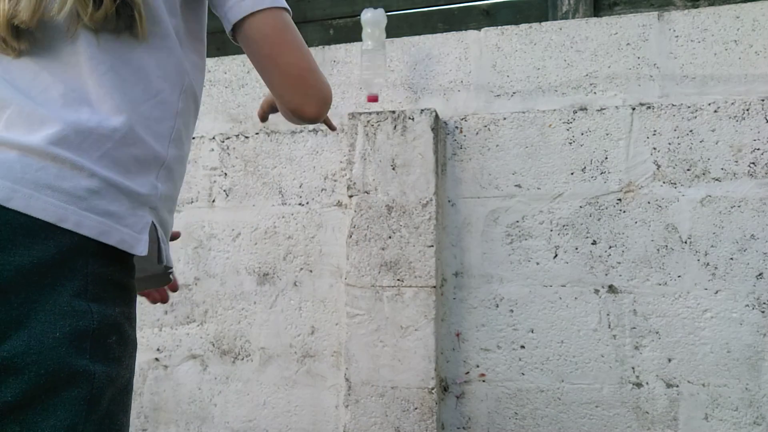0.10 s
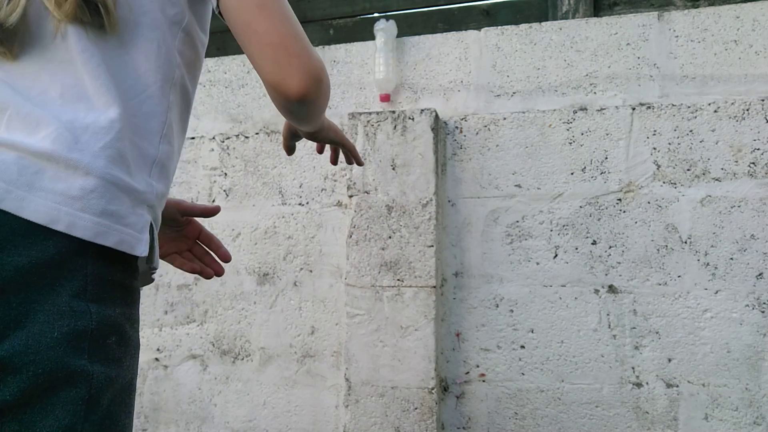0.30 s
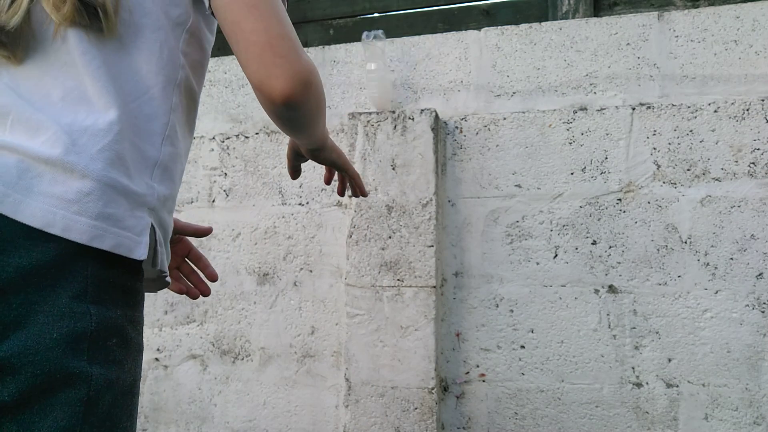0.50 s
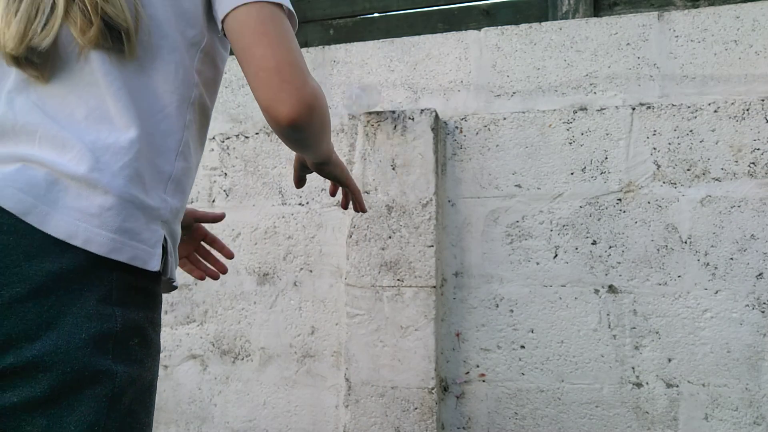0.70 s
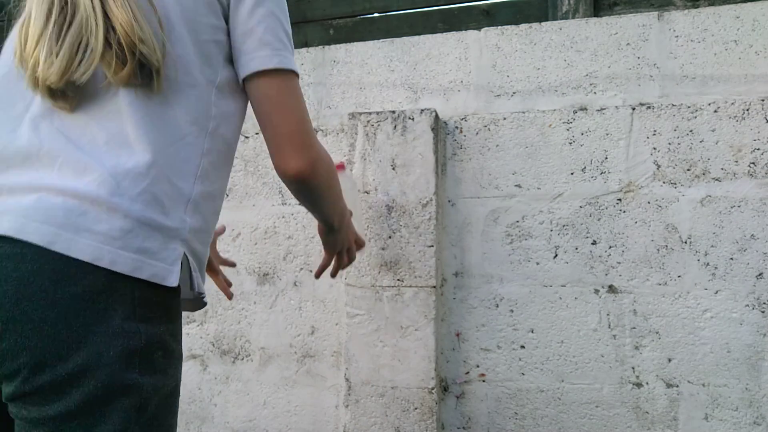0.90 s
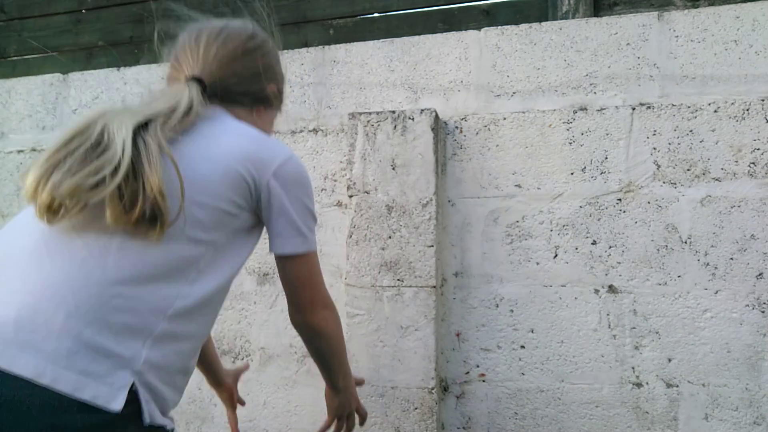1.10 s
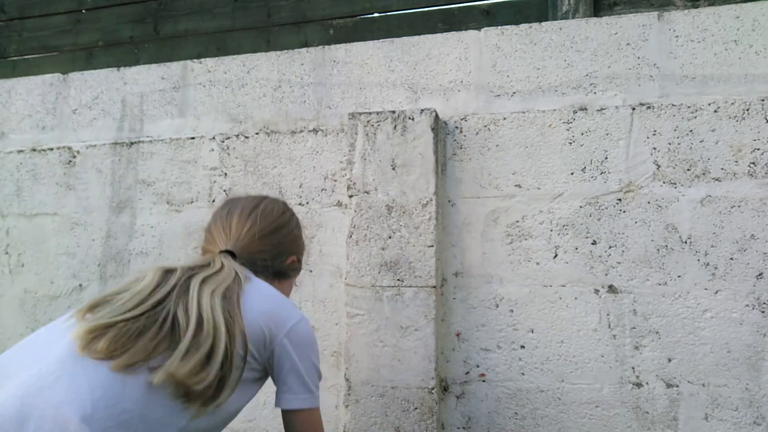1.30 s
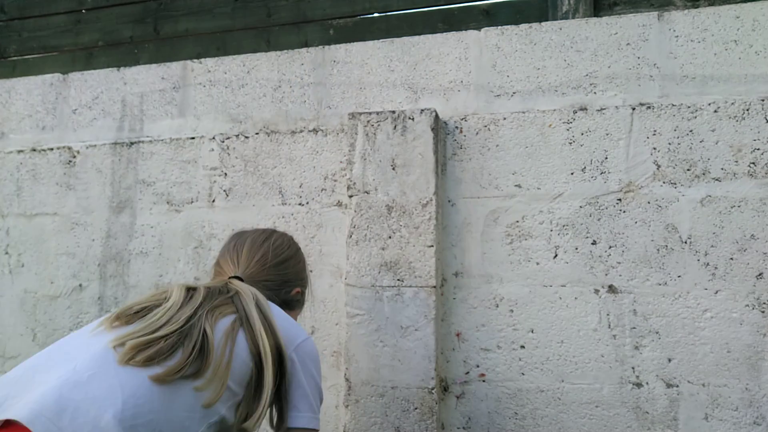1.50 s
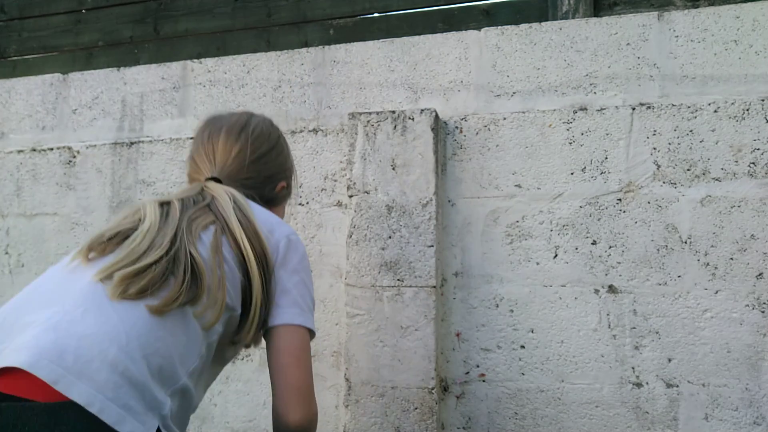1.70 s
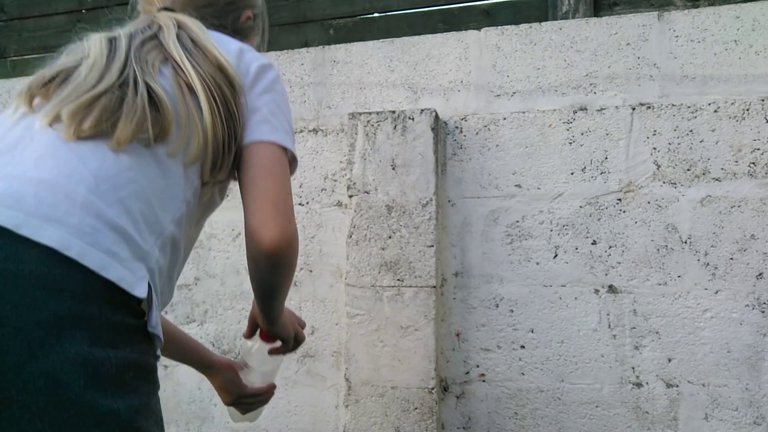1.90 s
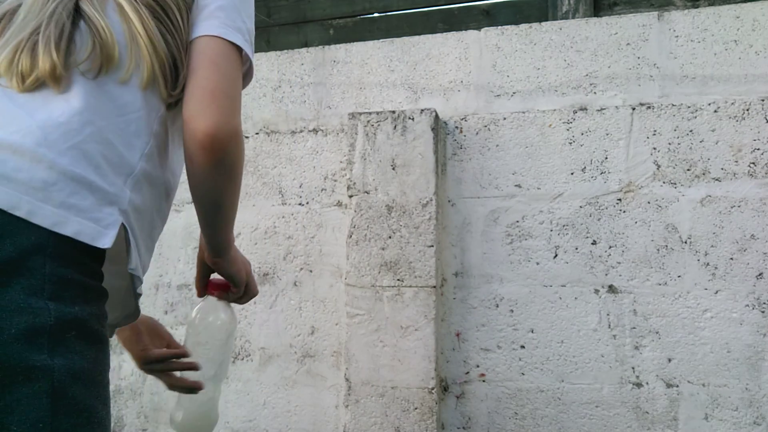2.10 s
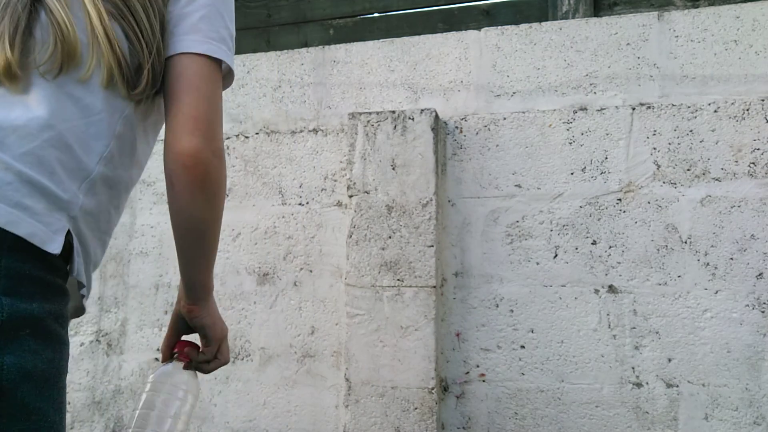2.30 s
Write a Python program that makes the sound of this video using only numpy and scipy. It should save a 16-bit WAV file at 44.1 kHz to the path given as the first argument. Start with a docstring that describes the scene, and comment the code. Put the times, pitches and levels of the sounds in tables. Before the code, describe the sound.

A partly filled plastic bottle knocks sharply on a concrete ledge at 0.2 seconds, bouncing and toppling by 0.4. After a few faint ticks, it hits gritty ground at about 1.2 seconds with a clatter, thud and crunch, bumping again at 1.4. Faint water dribbles, small clicks and rustling clothes follow until about 2.3 as it is picked up. The yard adds a short echo, and far traffic rumbles quietly.

```python
"""Far traffic rumbles under a faint hiss as a partly filled plastic bottle knocks on a concrete ledge.
It topples, drops to gritty ground and is picked up. Each knock rings the bottle's modes with a rattle
and a crack; its weight thuds, water dribbles inside and grit crunches. The yard walls send back a dull
wash and a few slaps. Clothes and soles rustle, and a low hum passes after the fall."""
import sys
import numpy as np
from scipy import signal
from scipy.fft import rfft, irfft
from scipy.io import wavfile
from scipy.ndimage import map_coordinates

SR = 44100
rng = np.random.default_rng(int(sys.argv[2]) if len(sys.argv) > 2 else 0)


def transcribe(u):
    """Save the signal u as a 16-bit wav file named by the first command-line argument.

    u: samples, shape (n,) or (channels, n), limited to [-1, 1]; the rate is SR.
    q: integer samples, one column per channel.
    """
    v = np.clip(np.atleast_2d(u).T, -1, 1)
    q = np.round(v * 32767).astype(np.int16)
    wavfile.write(sys.argv[1], SR, q)


N = 110250
TIME = np.arange(N) / SR
HIT_TIME = TIME[:SR // 4]


def amp(db):
    return 10 ** (np.asarray(db) / 20)


def unit_rms(x):
    return x / np.sqrt(np.mean(x ** 2) + 1e-20)


def filtered(x, order, hz, kind):
    return signal.sosfilt(signal.butter(order, hz, kind, fs=SR, output="sos"), x)


def at_hz(curve, hz):
    pitches, values = np.transpose(curve)
    return np.interp(np.log(hz), np.log(pitches), values)


def fader(rows, column=1):
    """Gain over time from a dB column; -90 dB before the first row, holding the last level afterwards."""
    rows = np.array(rows)
    return amp(np.interp(TIME, rows[:, 0], rows[:, column], left=-90))


def pan(db):
    """Stereo gains with the left louder by db."""
    return amp([[db / 2], [-db / 2]])


def place(track, start_s, sound, pan_db):
    i = int(start_s * SR)
    track[:, i:i + len(sound)] += pan(pan_db) * sound[:N - i]


def ring(hz, db, t60):
    """One mode: a sine that dies away."""
    return amp(db - 60 * HIT_TIME / t60) * np.sin(2 * np.pi * hz * HIT_TIME)


def drift(rate_hz):
    """Smooth random wander, rms about 1."""
    step = 40
    pole = np.exp(-2 * np.pi * rate_hz * step / SR)
    slow = signal.lfilter([1], [1, -2 * pole, pole ** 2], rng.standard_normal(N // step + 2002))[2000:]
    return np.interp(np.arange(N) / step, np.arange(len(slow)), unit_rms(slow))


# Stereo image of the noise layers, centred bass and wide treble: pitch_hz, correlation
NOISE_IMAGE = [(60, 0.99), (240, .85), (700, 0.17), (1500, 0), (15000, 0.17)]
def banded_noise(spectrum, flicker_db, rate_hz):
    """Stereo noise in half-octave bands that flicker mostly together; rms 1."""
    out, together = 0, drift(rate_hz)
    edges = 2 ** np.arange(np.log2(spectrum[1][0]) - .5, np.log2(spectrum[-1][0]) + .1, .5)
    white = rng.standard_normal((2, 2, N))
    for k, (low, high) in enumerate(zip(edges, edges[1:])):
        mid, side = filtered(white[k % 2], 2, [low, min(high, .45 * SR)], "band")
        hz = np.sqrt(low * high)
        alike = at_hz(NOISE_IMAGE, hz)
        gain = amp(at_hz(spectrum, hz) + flicker_db * (together + 0.2 * drift(rate_hz)))
        out = out + gain * (np.sqrt(1 + alike) * mid + np.sqrt(1 - alike) * side * [[1], [-1]])
    return unit_rms(out)


# Tone of the rumble: pitch_hz, density_db
TRAFFIC_EQ = [(15, -48.5), (25, -19.5), (59, -19), (83, -0.5), (102, 2), (194, -21.5), (260, -19),
              (340, -49), (570, -120)]
# Its swells: time_s, level_db
TRAFFIC_FADER = [(0, -66), (.3, -51), (.6, -66), (.85, -67.5), (1.0, -72.5), (1.5, -65), (1.9, -67.5),
                 (2.2, -68.5), (2.4, -69.5), (2.5, -67)]
def traffic():
    """Far traffic arrives as a slowly swelling bass noise."""
    return fader(TRAFFIC_FADER) * banded_noise(TRAFFIC_EQ, flicker_db=.7, rate_hz=15) * pan(-1.2)


# Tone of the outdoor bed: pitch_hz, density_db
AIR_EQ = [(150, -28.5), (200, -20.5), (300, -21), (400, -20.5), (550, -26), (1000, -22.5), (2500, -33.5),
          (5000, -32), (9000, -30), (12000, -39), (16000, -46)]
def air(level_db=-72.5):
    """A faint, nearly steady hiss."""
    return amp(level_db) * banded_noise(AIR_EQ, flicker_db=.5, rate_hz=20)


# The bottle's modes: pitch_hz
MODE_PITCHES = [330, 408, 508, 620, 773, 957, 1075, 1183, 1300, 1599, 1862, 2123, 2915, 3320]
# How each mode answers a blow: base_hit_db, side_hit_db, t60_s
MODE_RINGS = [(-18, -32, 0.01), (-9.5, -26.5, 0.067), (-3, 6, 0.022), (-8, -5.5, 0.047), (-10, -14, 0.069),
              (-1, 7.5, 0.016), (-6, -9.5, 0.02), (-1.5, -13, 0.03), (-8, -1, 0.021), (7.5, -24.5, 0.02),
              (-3, 3, 0.014), (-9, -15, 0.049), (-11, -8, 0.039), (-25.5, -22, 0.023)]
# Bottle hits (side_share 0 = base, 1 = side): start_s, level_db, side_share, centre_hz, crack_db, pan_db
KNOCKS = [(0.2057, -7, 0.14, 1320, -6.5, 0.5), (0.2972, -28.5, 0.7, 1600, -16, -10),
          (0.3028, -22.5, 0.36, 1460, -6.5, 1.5), (.308, -26.5, 0.1, 370, -30, -4),
          (.325, -38.5, .3, 1500, 0, 0), (0.4143, -14, 0.99, 825, -11, 0.5),
          (0.697, -40, 0.55, 1390, -7, -2), (0.705, -46.5, 0, 1223, -5, 3.5),
          (1.1657, -19.5, 0.51, 550, -31, -4.5), (1.173, -21, 1, 605, -1.5, 0),
          (1.1777, -16, 0.42, 890, -15, 3.5), (1.186, -26, 0.13, 770, -12, -8.5),
          (1.226, -33, 0.34, 660, -20, -2), (1.246, -47.5, 0.4, 640, -8, -13),
          (1.409, -44.5, 0.8, 900, 2, 2), (1.416, -42.5, .3, 1520, -17, 5),
          (1.425, -40.5, 0.5, 680, -14, -5), (1.551, -51, 0.12, 1400, 4, -2.5),
          (1.565, -38.5, 0.35, 1310, -38, -1)]
CONTACT_S, FALLOFF_DB_PER_OCT2, SCATTER_DB = 0.00044, 3, 1.2
RATTLE_DB, RATTLE_T60_S = -18, .045
CRACK_BAND_HZ, CRACK_T60_S, CRACK_TAIL_DB, CRACK_TAIL_T60_S = [1900, 8000], .009, -12, 0.064
def bottle_knocks():
    """Each blow rings the modes near its centre pitch; the plastic wall rattles and cracks."""
    out, t = np.zeros((2, N)), HIT_TIME
    for start_s, level_db, side_share, centre_hz, crack_db, pan_db in KNOCKS:
        scatter = rng.normal(0, SCATTER_DB, len(MODE_RINGS))
        noise = rng.standard_normal((2, len(t)))
        body = 0
        for hz, (base_db, side_db, t60), scatter_db in zip(MODE_PITCHES, MODE_RINGS, scatter):
            mode_db = base_db + side_share * (side_db - base_db) + scatter_db
            falloff_db = FALLOFF_DB_PER_OCT2 * np.log2(hz / centre_hz) ** 2
            body -= ring(hz, mode_db - falloff_db, t60)
        body *= 1 - np.exp(-t / CONTACT_S)
        rattle = unit_rms(filtered(noise[0], 2, [centre_hz / 1.7, centre_hz * 1.7], "band"))
        rattle *= amp(RATTLE_DB - 60 * t / RATTLE_T60_S)
        crack = filtered(noise[1], 1, CRACK_BAND_HZ, "band")
        crack *= amp(-60 * t / CRACK_T60_S) + amp(CRACK_TAIL_DB - 60 * t / CRACK_TAIL_T60_S)
        knock = body / np.abs(body).max() + rattle + amp(crack_db) * crack
        place(out, start_s, amp(level_db) * knock, pan_db)
    return filtered(out, 4, hz=260, kind="high")


# Reverb bands of the yard: pitch_hz, level_db, t60_s, correlation
YARD_WASH = [(250, -29.5, .35, .9), (493, -27.5, 0.1, .75), (1000, -35, 0.37, 1), (2000, -27.5, 0.16, .5),
             (4000, -26.5, 0.22, .4), (8000, -26, .3, .4), (13200, -35.5, 0.14, .4)]
# Slapback off the walls: delay_s, level_db, smear_s
WALL_SLAPS = [(.022, -14, .003), (.043, -3, .003), (.053, 2, 0.0025), (0.061, 0, 0.0016),
              (0.099, -11.5, 0.029)]
PREDELAY_S, WASH_HOLD_S, YARD_RETURN_DB = .004, 0.023, -17.5
def yard_echo(send):
    """The walls return smeared slaps and a wash that dies away in overlapping octaves."""
    t = TIME[:SR // 2]
    mid, side = rfft(rng.standard_normal((2, len(t))))
    slaps = sum(amp(db) * np.exp(-((t - delay) / smear) ** 2) for delay, db, smear in WALL_SLAPS)
    octaves = np.log2(np.arange(len(mid)) * 2 + 1)   # bins are 2 Hz apart
    centres = np.log2([row[0] for row in YARD_WASH])
    response = 0
    for k, (hz, db, t60, alike) in enumerate(YARD_WASH):
        white = np.sqrt(1 + alike) * mid + np.sqrt(1 - alike) * side * [[1], [-1]]
        band = irfft(white * np.interp(octaves, centres, np.arange(len(centres)) == k), len(t))
        wash = amp(-60 * np.maximum(t - WASH_HOLD_S, 0) / t60) * (t > PREDELAY_S)
        response += amp(db) * band * (wash + slaps)
    return amp(YARD_RETURN_DB) * signal.fftconvolve(send, response, axes=1)[:, :N]


# Low-end weight: start_s, level_db, pitch_hz, t60_s
THUDS = [(0.298, -29, 121, 0.052), (.305, -31.5, 411.6, .09), (1.167, -27.5, 125, 0.063),
         (1.176, -12.5, 157, 0.025), (1.214, -33, 240, 0.12), (1.26, -35, 158, 0.033),
         (1.313, -51.5, 106.3, 0.27), (1.407, -36, 154.5, 0.071), (1.411, -33, 287, 0.043),
         (1.424, -25.5, 479, 0.017)]
def thuds(attack_s=.003):
    """The water-laden bottle and the feet land as dull, soft-edged tones."""
    out = np.zeros((2, N))
    attack = 1 - np.exp(-HIT_TIME / attack_s)
    for start_s, db, hz, t60 in THUDS:
        place(out, start_s, ring(hz, db, t60) * attack, pan_db=-1.3)
    return out


# Moves of clothes and soles: time_s, treble_db, mid_db
RUSTLE_FADERS = [(0, -99, -85), (.5, -72, -62), (.62, -76.5, -71), (.8, -100, -81.5), (.84, -73, -70.5),
                 (.93, -92, -89), (1.05, -69.5, -71.5), (1.13, -73, -73), (1.33, -76, -71.5),
                 (1.43, -66.5, -65.5), (1.465, -56.5, -57.5), (1.5, -64.5, -72), (1.59, -70, -80),
                 (1.645, -63, -68), (1.71, -75.5, -70), (1.76, -68, -67), (1.82, -62, -63.5),
                 (1.9, -62, -62.5), (1.96, -64, -67), (2.01, -64.5, -62.5), (2.04, -60, -55),
                 (2.075, -62.5, -59.5), (2.1, -71.5, -67.5), (2.15, -67, -69.5), (2.19, -77, -71),
                 (2.3, -71.5, -66), (2.34, -72.5, -66), (2.375, -75.5, -72.5), (2.5, -84, -79)]
# Sheen of the rustle: pitch_hz, density_db
RUSTLE_TREBLE_EQ = [(1760, -35.5), (3000, -13), (8820, -1), (12000, -20), (14400, -19), (16000, -22)]
# Body of the rustle: pitch_hz, density_db
RUSTLE_MID_EQ = [(180, -41.5), (300, -9), (988, -10.5), (1110, -13.5), (1720, -11), (4000, -12),
                 (5200, -48.5), (8800, -120)]
def rustle():
    """Clothes and soles rub: two layers of fluttering noise, each on its own fader."""
    treble = fader(RUSTLE_FADERS, 1) * banded_noise(RUSTLE_TREBLE_EQ, flicker_db=1, rate_hz=60)
    mids = fader(RUSTLE_FADERS, 2) * banded_noise(RUSTLE_MID_EQ, flicker_db=1.2, rate_hz=50)
    return treble * pan(-1) + mids * pan(-2)


# Small, bright clicks: start_s, level_db, pitch_hz
TICKS = [(.568, -59, 3300), (.586, -58.5, 1800), (.638, -60, 1900), (.78, -50.5, 2970), (.815, -44, 7570),
         (.82, -57, 1350), (.847, -61, 3100), (.865, -50.5, 2870), (.868, -58, 1540), (1.52, -47, 2370),
         (1.611, -74, 2190), (1.678, -46, 2490), (1.75, -71, 2780), (1.776, -48, 2830), (1.788, -34, 8100),
         (1.789, -53, 1270), (1.93, -67, 6600), (2.255, -54.5, 8000), (2.325, -53, 4970)]
def ticks(t60_cycles=44, spread=0.16):
    """Water and grit tick, each time a short cluster of five detuned tones."""
    out = np.zeros((2, N))
    for start_s, db, hz in TICKS:
        pitches = hz * (1 + spread * np.linspace(-1, 1, 5) + 0.023 * rng.standard_normal(5))
        cluster = sum((-1) ** k * ring(pitch, db, t60_cycles / hz) for k, pitch in enumerate(pitches))
        place(out, start_s, cluster / 2, pan_db=-2.5)
    return out


# Trickle after the topple and after the fall: time_s, level_db
DRIBBLE_FADER = [(.74, -93), (.8, -75.5), (.86, -72), (.9, -90), (1.42, -93), (1.47, -66), (1.6, -65.5),
                 (1.7, -84), (1.77, -69), (1.83, -73.5), (1.9, -88.5), (2.5, -103)]
def dribble(drops_per_s=220, low_hz=2100, high_hz=3200, t60_cycles=28):
    """Random drops inside the bottle each ring briefly at one of eight pitches."""
    sizes = amp(3.5 * np.minimum(rng.exponential(1, N), 4))
    drops = sizes * (rng.random(N) < drops_per_s / SR)
    pitch_index, out = rng.integers(0, 8, N), 0
    for k, hz in enumerate(np.geomspace(low_hz, high_hz, 8)):
        out += signal.fftconvolve(drops * (pitch_index == k), ring(hz, 0, t60_cycles / hz))[:N]
    return fader(DRIBBLE_FADER) * unit_rms(out) * pan(-2)


# Crunches on the ground: start_s, level_db, attack_s, t60_s
CRUNCHES = [(1.163, -29, 0.016, 0.09), (1.19, -45, 0.0025, 0.061), (1.356, -49.5, 0.001, 0.065),
            (1.408, -51.5, .003, 0.17), (2.324, -61, 0.0048, .15)]
# Tone of the grit: pitch_hz, density_db
GRIT_EQ = [(880, -6), (1500, 0), (5660, -4), (7920, 3.5), (8660, -5), (9950, -3), (16000, -18)]
def grit():
    """Grit crunches in bursts of crackling noise."""
    bursts = 0
    for start_s, db, attack_s, t60 in CRUNCHES:
        attack = np.clip((TIME - start_s) / attack_s, 0, 1)
        bursts += attack * amp(db - 60 * np.maximum(TIME - start_s - attack_s, 0) / t60)
    return bursts * banded_noise(GRIT_EQ, flicker_db=2.5, rate_hz=140)


# Sub-bass swell: time_s, level_db
HUM_FADER = [(1.3, -88), (1.5, -64), (1.65, -75), (1.8, -76), (2.0, -92), (2.5, -91)]
def low_hum():
    """A narrow band of deep noise swells and fades."""
    return fader(HUM_FADER) * unit_rms(filtered(rng.standard_normal(N), 2, hz=[38, 58], kind="band"))


# Delay at the left ear: time_s, lag_ms
LEFT_LAG = [(0, 0.013), (.6, 0.017), (1.1, 0.078), (1.6, 0.13), (2.5, 0.26)]
def slide_right(near):
    """The left ear hears the near sounds later as the bottle drops."""
    left, right = near
    lag_samples = np.interp(TIME, *np.transpose(LEFT_LAG)) * SR / 1000
    return np.array([map_coordinates(left, [np.arange(N) - lag_samples], order=3), right])


def scene():
    """Hits with their echo and the close textures, over the distant bed."""
    hits = bottle_knocks() + thuds() + ticks()
    send = hits * np.where(TIME < 1, 1, amp(-4))   # less comes back from sounds on the ground
    near = hits + yard_echo(send) + grit() + rustle() + dribble()
    return slide_right(near) + traffic() + air() + low_hum()


def record(dry):
    """Master EQ: the left side is duller, the deep bass rolls off, the top is cut."""
    treble = filtered(dry, 1, hz=6000, kind="high")
    shelved = dry + treble * (amp([[-7.5], [0]]) - 1)
    trimmed = filtered(shelved, 1, hz=40, kind="high")
    return signal.sosfilt(signal.cheby2(14, 60, 16400, fs=SR, output="sos"), trimmed)


dry = scene()
out = record(dry)
transcribe(out)
```